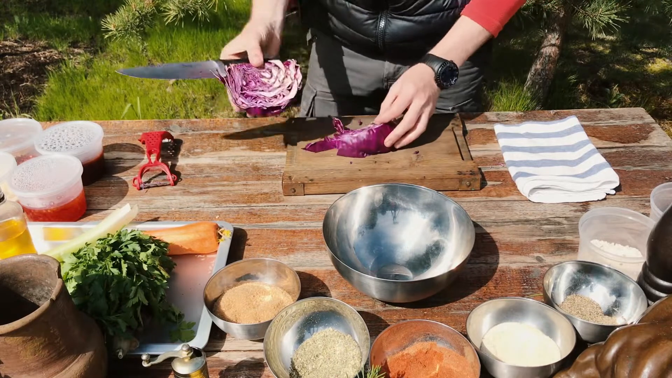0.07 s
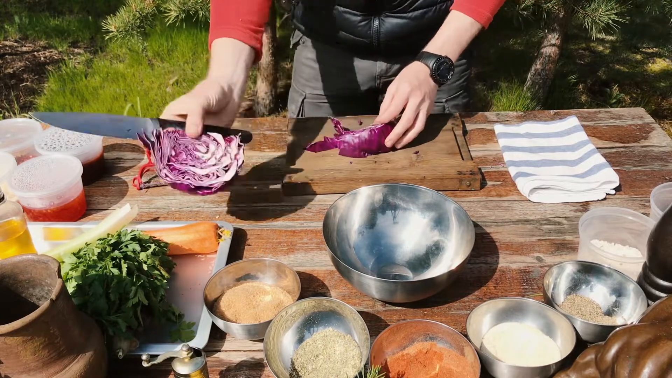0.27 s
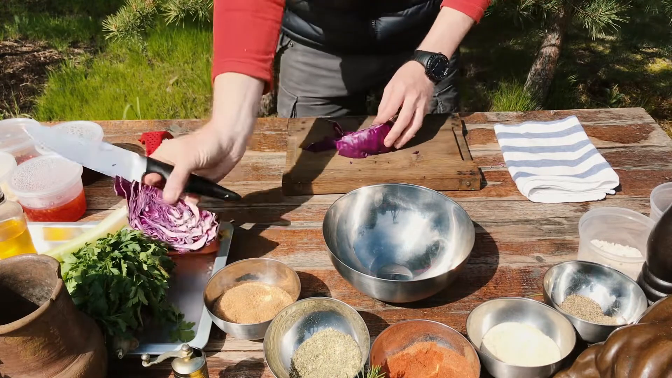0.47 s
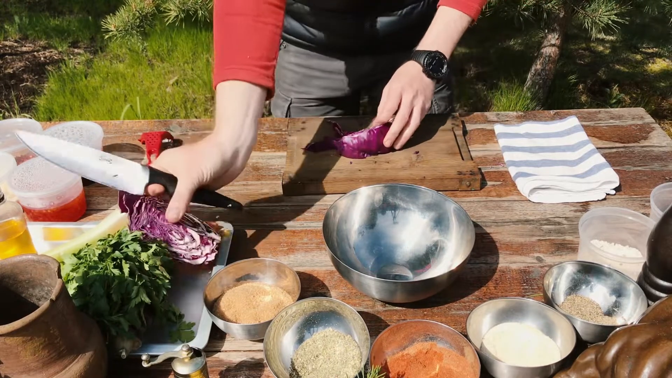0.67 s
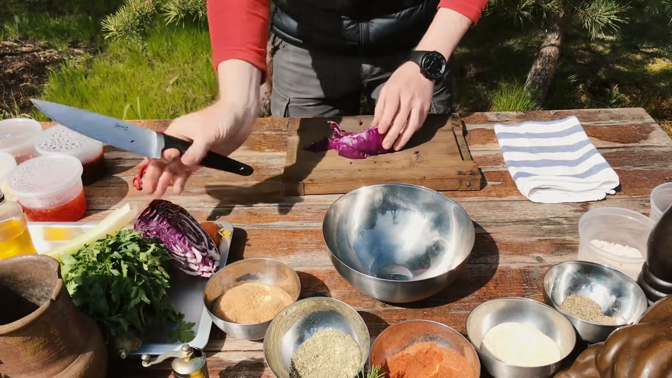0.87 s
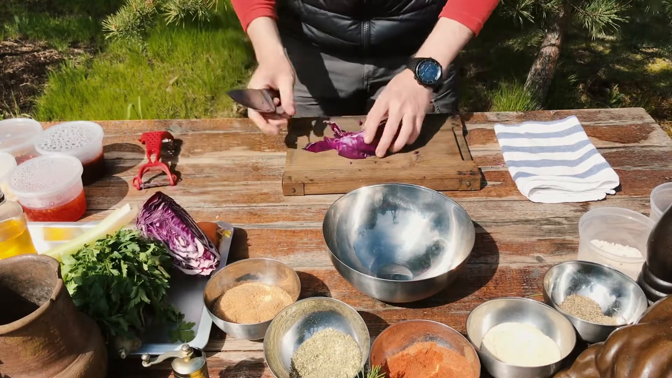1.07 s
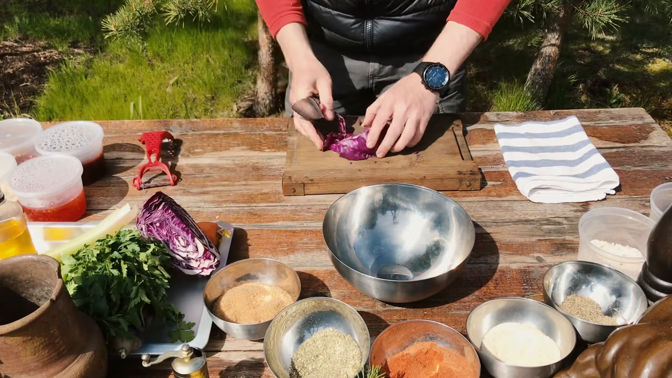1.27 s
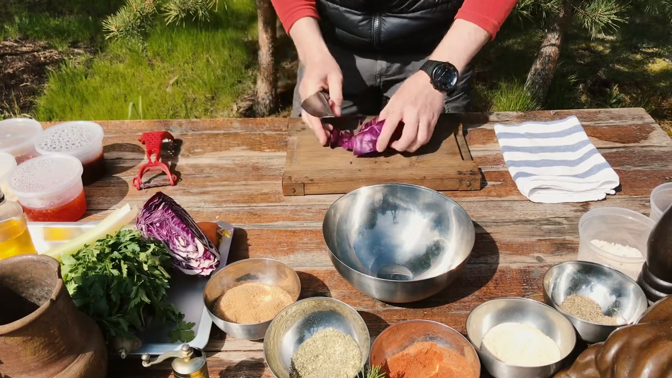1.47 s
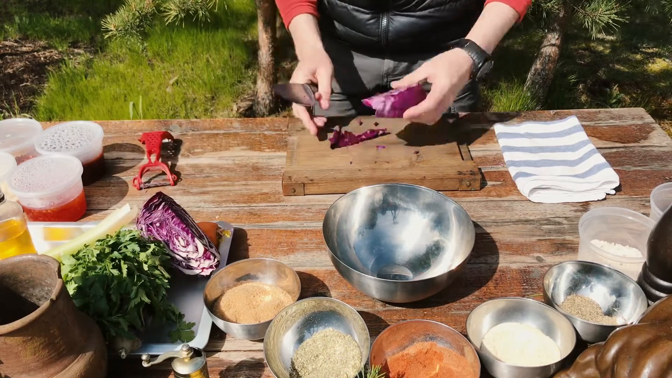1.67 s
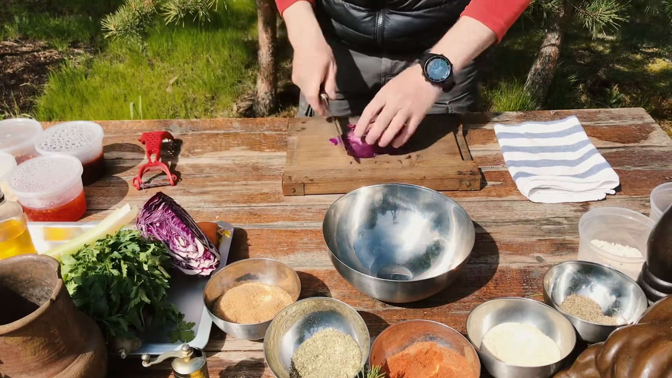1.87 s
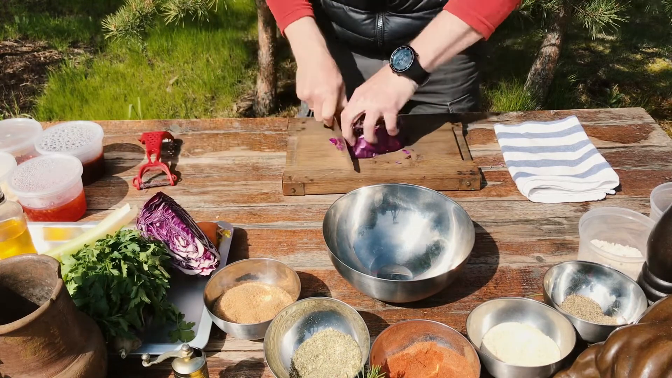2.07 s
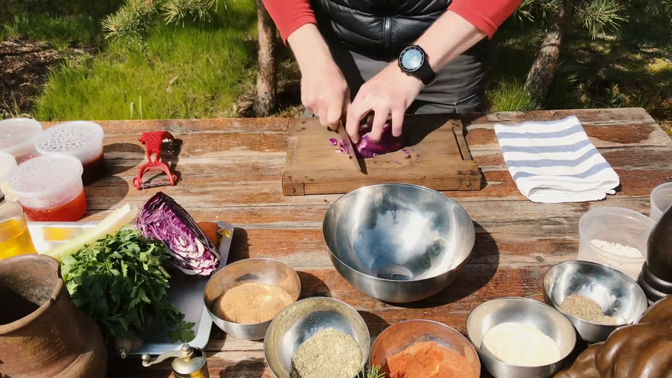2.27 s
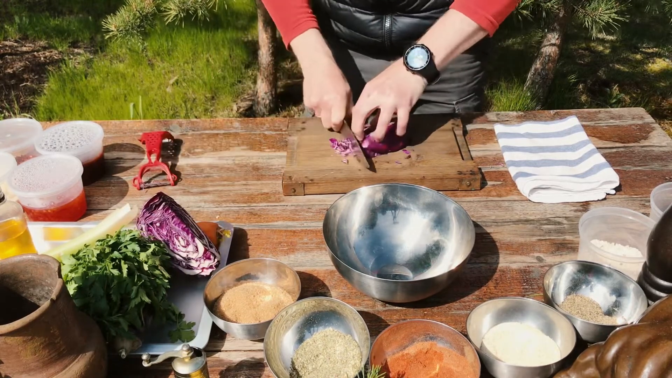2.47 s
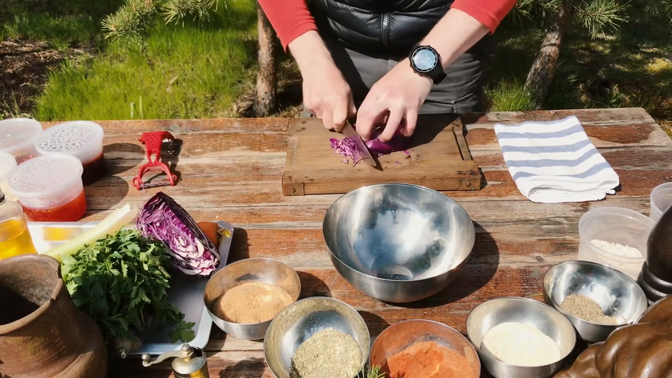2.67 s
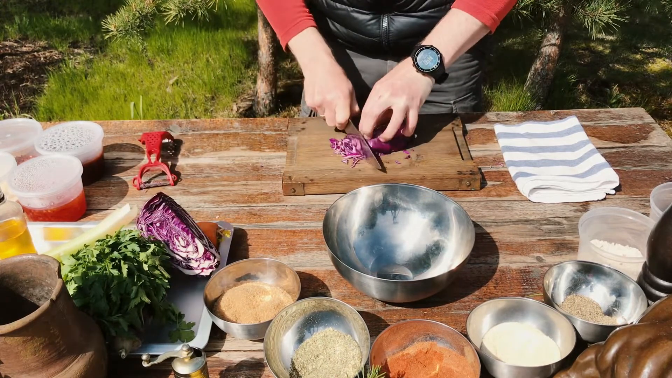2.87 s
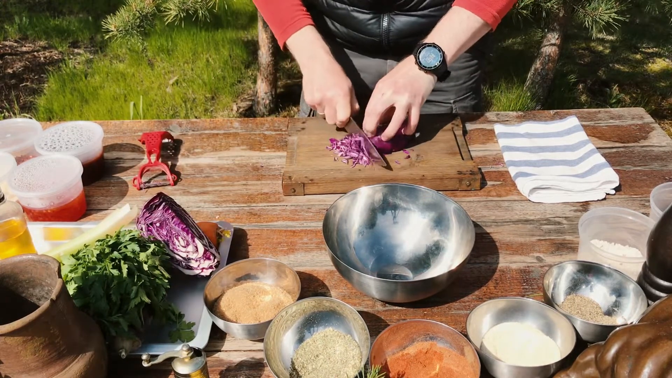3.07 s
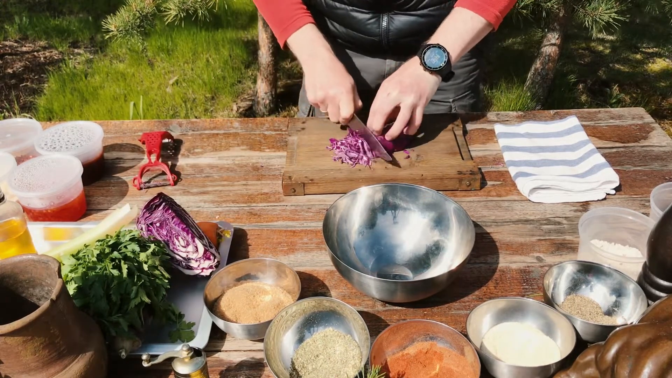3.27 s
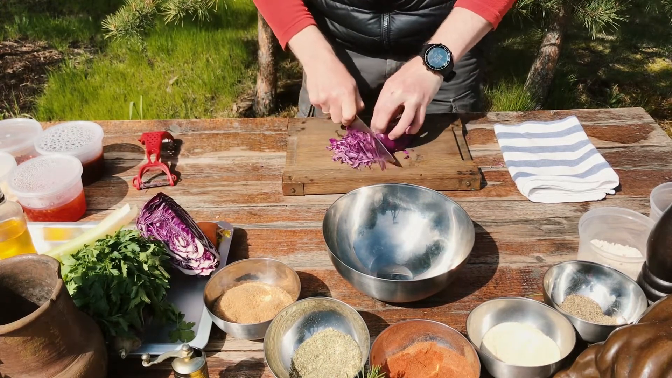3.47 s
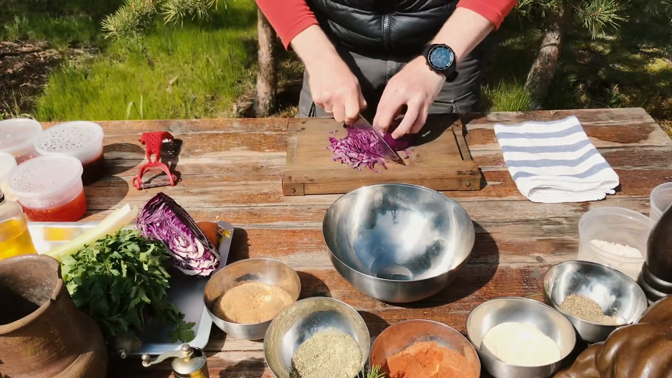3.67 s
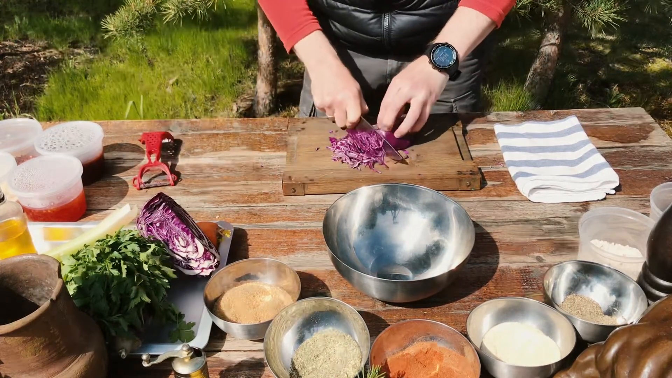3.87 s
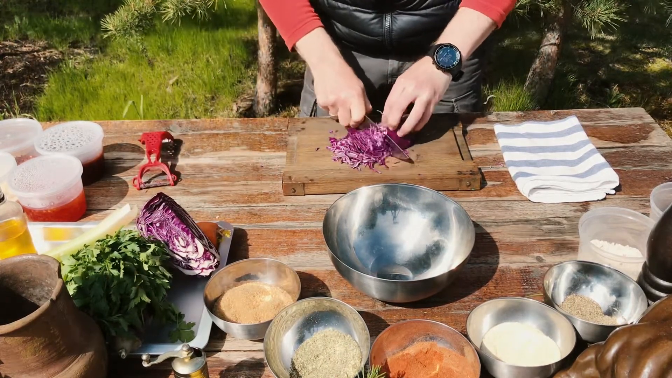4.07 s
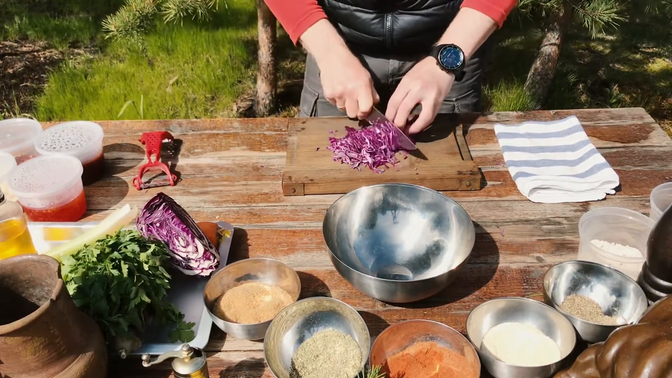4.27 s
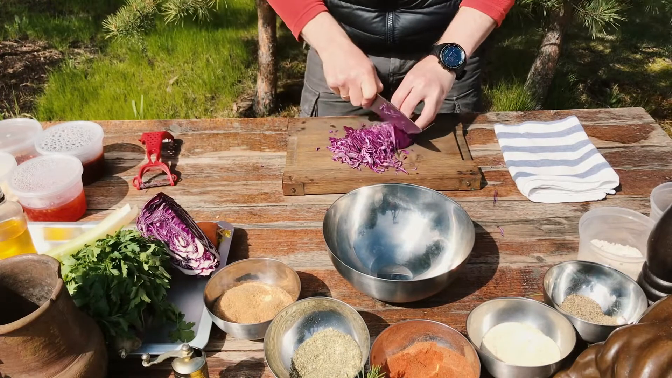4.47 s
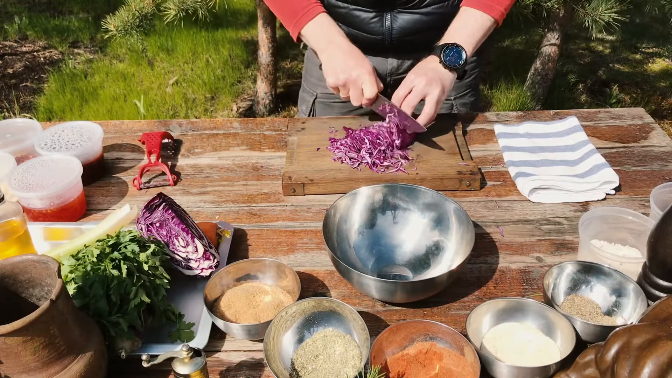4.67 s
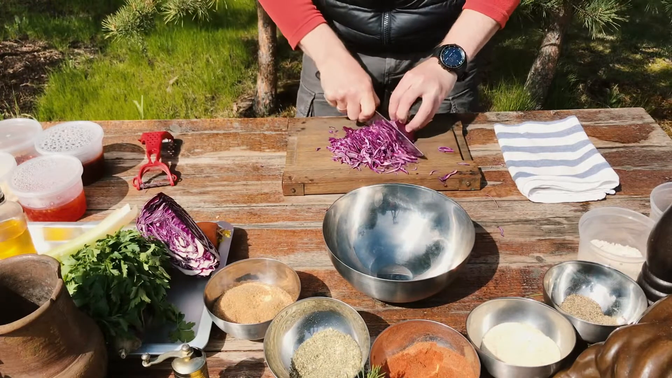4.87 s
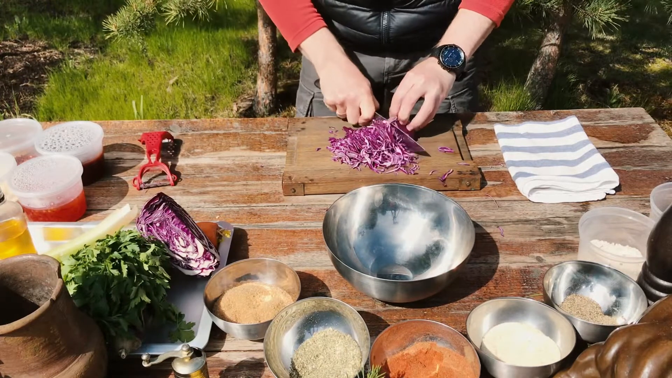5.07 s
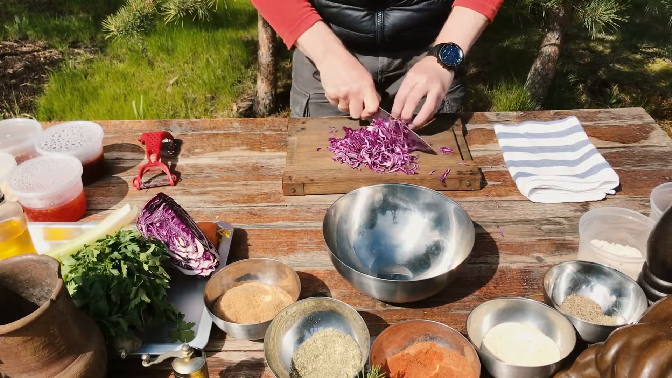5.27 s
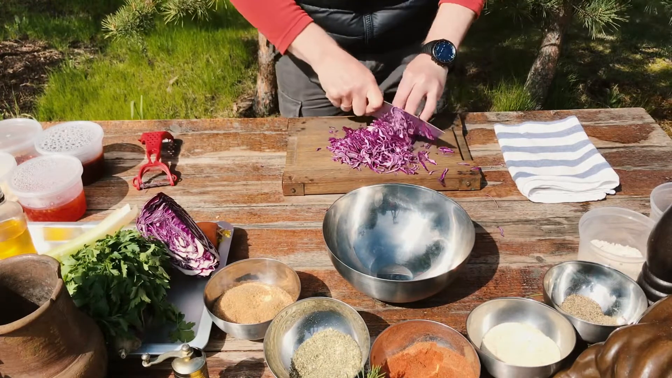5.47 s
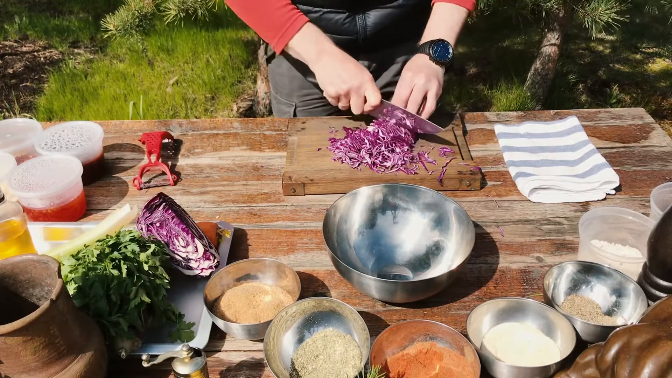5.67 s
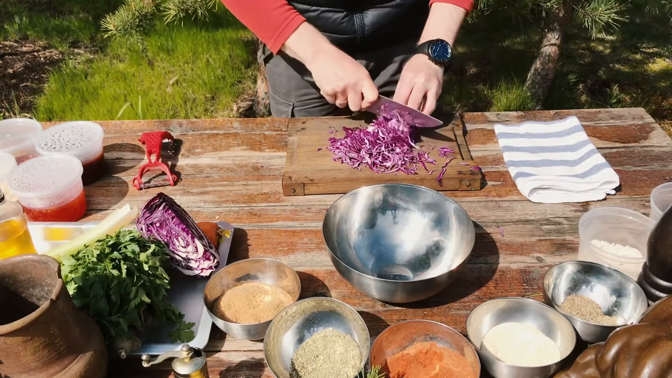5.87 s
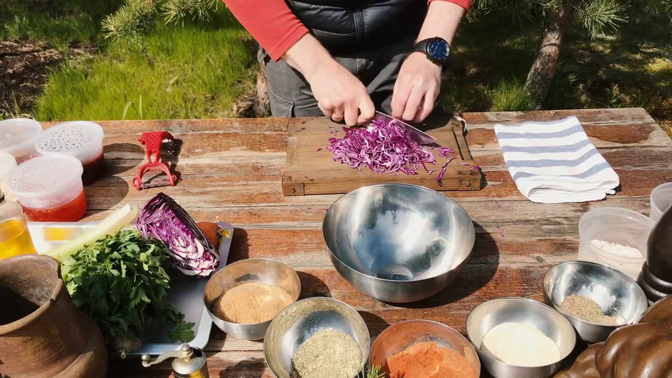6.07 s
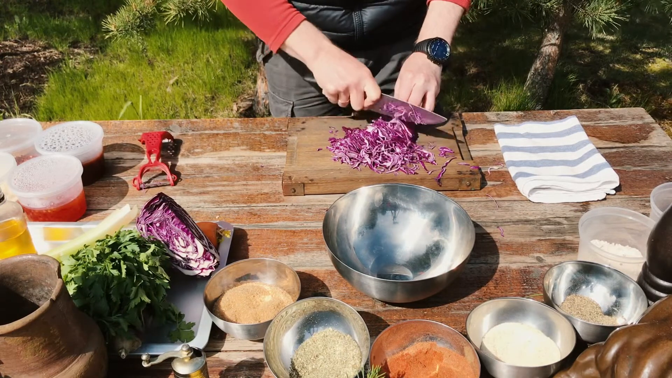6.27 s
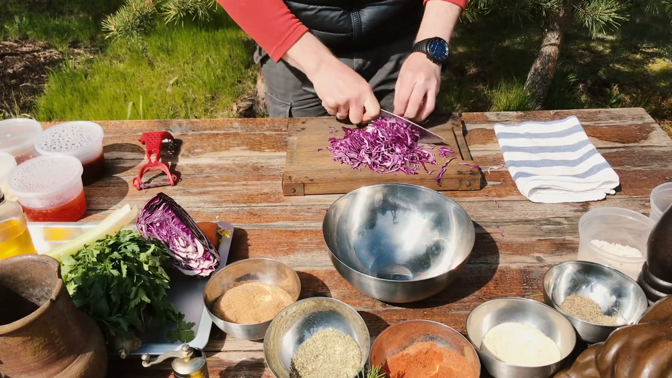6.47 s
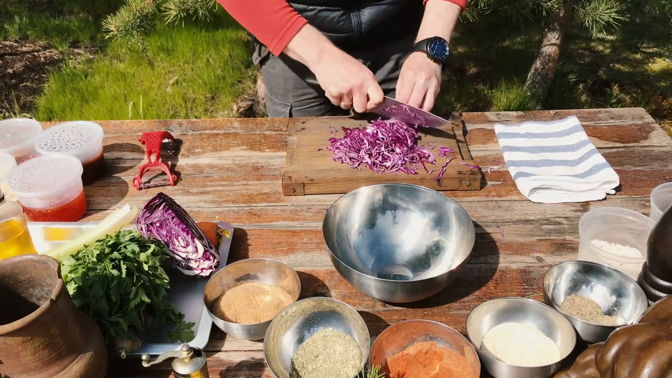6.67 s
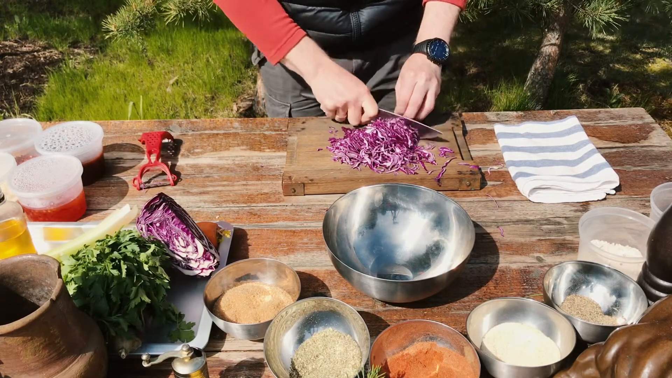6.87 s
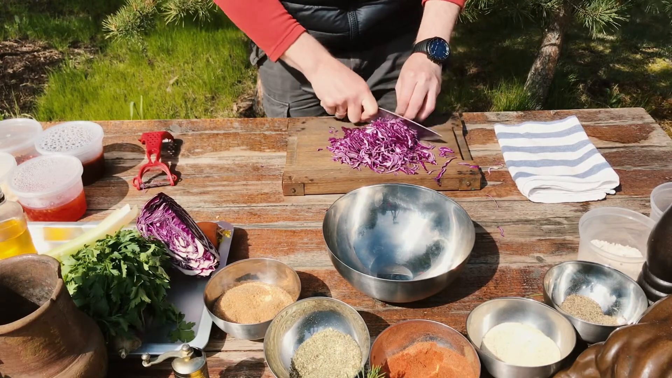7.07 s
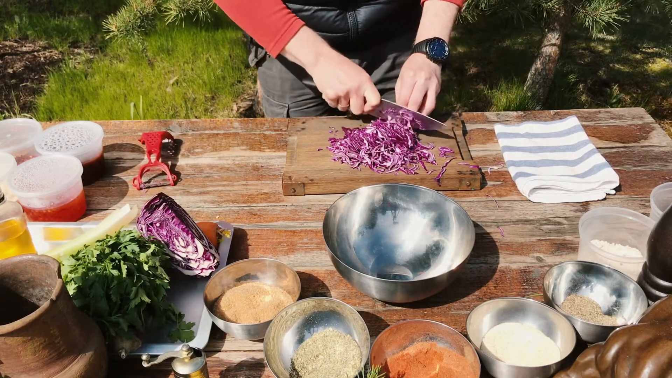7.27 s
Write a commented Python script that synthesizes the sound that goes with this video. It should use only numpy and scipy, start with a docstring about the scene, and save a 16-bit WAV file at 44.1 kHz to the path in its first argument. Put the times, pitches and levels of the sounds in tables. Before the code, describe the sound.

Outdoors in a quiet garden, a knife shreds crisp cabbage on a wooden board in quick runs of woody knocks and crunchy slices.

```python
"""Out of doors, on a plank table in a quiet garden, a chef's knife shreds red cabbage on a wooden board.
Strokes hiss as coloured, grainy noise; the edge then knocks in quick runs, each blow ringing damped modes.
Before the cutting, leaves rustle as sparse ticks and cabbage is set aside with soft bumps of fading noise.
A breeze rumbles over the hush as wandering noise, a thin wavering tone whistles far off,
and the table, the dishes and the trees answer with tails of fading noise."""
import sys
import numpy as np
from scipy import signal
from scipy.fft import rfft, irfft, next_fast_len
from scipy.io import wavfile
from scipy.ndimage import uniform_filter1d

SR = 44100
rng = np.random.default_rng(int(sys.argv[2]) if len(sys.argv) > 2 else 0)


def dump_mix(stems):
    """Bounce the given channels to the path in sys.argv[1] as a 16-bit WAV at rate SR."""
    frames = np.atleast_2d(stems).T  # one column per channel
    limited = np.clip(frames, -1, 1)  # hard clip at full scale
    pcm = np.round(limited * 32767).astype(np.int16)
    wavfile.write(sys.argv[1], SR, pcm)


N = 322128
TIME = np.arange(N) / SR  # s
SIZE = 4096  # samples in one blow
TOP_HZ = 15900

# Breeze on the microphone. Each row: time in seconds, relative rumble level in dB.
BREEZE = [(0.0, -64), (.3, -60), (.9, -72), (1.25, -64), (2.0, -67.5), (2.6, -75), (3.2, -69), (3.58, -71),
          (3.72, -48.5), (4.6, -55), (4.9, -65), (5.7, -56.5), (6.5, -59.5), (7.3, -57)]
# Hush of the garden. Each row: time in seconds, relative level in dB.
HUSH = [(0.0, -61), (.75, -61.5), (1.54, -66), (4.0, -65), (6.0, -61), (6.7, -63.5), (7.3, -62.5)]
# Spectra of the breeze and the garden. Each row: frequency in Hz, gain in dB.
RUMBLE_COLOUR = [(18, -18), (32, -13), (55, 5.5), (100, 2.5), (170, -9), (300, -22), (700, -45),
                 (2000, -79)]
GARDEN_COLOUR = [(15, -33.5), (25, -9), (58, -2.5), (102, -7), (145, -3.5), (229, -12), (270, -11.5),
                 (373, -11.5), (405, -9), (451, -18.5), (863, -13), (1330, -22), (5280, -35),
                 (16000, -38.5)]
# A thin high whistle far off. Each row: start in seconds, end in seconds, pitch in Hz,
# relative level in dB, depth of the waver in Hz.
WHISTLES = [(0.51, 1.07, 4050, -71, 110), (1.905, 2.113, 4160, -71, 380)]

# Spectra of the answers from table, dishes and trees. Each row: frequency in Hz, gain in dB.
TABLE_COLOUR = [(25, -21), (80, 3.0), (160, -2.5), (400, -7.5), (900, -16.5), (3000, -63)]
DISHES_COLOUR = [(300, 0.29), (3000, 0.32), (7000, 2.4)]
TREES_COLOUR = [(100, 11), (600, -3.0), (970, -5), (1550, 4), (2100, -1), (2600, -2), (3700, -6.0), (8000, 0.5)]

# Cabbage and hands meeting the table. Each row: time in seconds, relative peak level in dB,
# relative share of the mids in dB.
BUMPS = [(0.505, -46.5, -6.5), (0.582, -47, -8), (0.743, -34.5, -8), (1.087, -47.5, -35),
         (1.197, -35.5, -14), (1.789, -45.5, -16), (1.821, -39, -4)]
# Spectra of the bumps and of their low part. Each row: frequency in Hz, gain in dB.
BUMP_COLOUR = [(30, -37), (70, 9), (130, 2), (330, -1.5), (650, -16.5), (1400, -11), (2600, -27.5),
               (5000, -44), (16000, -53)]
BUMP_LOWS = [(350, 1.5), (900, -15.0)]

# Leaves rustling in the hands. Each row: start in seconds, end in seconds, level in dB.
RUSTLES = [(0.065, 0.087, -63), (0.45, 0.664, -63.5), (0.692, 0.798, -63.5), (0.743, 0.763, -52.5),
           (0.878, 0.97, -70), (1.32, 1.45, -66), (1.496, 1.528, -68.5), (1.931, 1.966, -61.5)]
# Spectrum of the rustling. Each row: frequency in Hz, gain in dB.
RUSTLE_COLOUR = [(300, -12), (1500, -4), (3200, 9), (6000, 5), (10000, -1), (14000, 2.5)]

# Strokes of the blade through the leaves. Each row: start in seconds, end in seconds, relative level in dB.
CUTS = [(2.229, 2.245, -53), (2.407, 2.48, -51.5), (2.639, 2.656, -58.5), (2.678, 2.71, -54),
        (2.893, 3.011, -51), (3.172, 3.297, -52.5), (3.45, 3.547, -49.5), (3.59, 3.624, -57),
        (3.798, 3.836, -47.5), (3.853, 3.923, -48), (4.093, 4.14, -55.5), (4.152, 4.192, -49.5),
        (4.264, 4.309, -49.5), (4.477, 4.512, -51), (4.53, 4.58, -49.5), (4.642, 4.696, -51.5),
        (4.798, 4.81, -62), (4.916, 5.078, -47), (5.243, 5.254, -62), (5.388, 5.49, -49),
        (5.602, 5.611, -49), (5.772, 5.863, -51), (6.062, 6.088, -52.5), (6.202, 6.245, -48),
        (6.268, 6.326, -52.5), (6.343, 6.45, -51), (6.496, 6.536, -57), (6.613, 6.64, -54.5),
        (6.675, 6.718, -58.5), (6.77, 6.798, -51.5), (7.057, 7.108, -57), (7.15, 7.198, -52.5),
        (7.263, 7.307, -55.5)]
# Spectra of the cut leaves and of the quiet share of their crackle. Each row: frequency in Hz, gain in dB.
LEAF_COLOUR = [(200, -58), (900, -9.5), (2000, -1.5), (4200, 0), (5200, -0.5), (7000, -1.5), (10500, -3),
               (13500, 2.5), (16000, 2)]
PART_COLOUR = [(5000, -16.0), (10000, -13)]

# Edge meets board. Each row: time in seconds, relative force in dB, hardness in dB, tick of the edge in dB.
KNOCKS = [(2.1409, 5.5, 0, 1), (2.1931, 5.5, 4, 1.5), (2.2341, 1.1, 3.5, -7.5), (2.42, -0.5, -12.5, 4),
          (2.46, -3, 6.5, -14), (2.4974, -7, -5, 4), (2.6901, 3, 2, -1.5), (2.723, 4, 4, -0.5),
          (2.7589, -5.5, -3.5, 7), (2.9157, -3.5, -4.5, 0), (2.947, 5.5, -4, 11.5), (2.9965, 2.5, -3.5, -5),
          (3.0401, -5, -5, 1.5), (3.193, 1, 0.5, 0.5), (3.2289, 6, -1, 1), (3.2734, 4.5, -2, 5),
          (3.3187, -6, 0, 2), (3.4799, -3, 1.5, -4), (3.5177, 5, -3.5, 5.5), (3.5567, 6, -.5, 4),
          (3.6129, -3.5, -1.5, 0), (3.763, -6, 5.5, 1.5), (3.8317, -2, -3.5, -3), (3.8762, 4.5, 1.5, 7.5),
          (3.9123, 2, 2, 2), (3.9719, -8.5, 3.5, -1), (4.188, 2, 2.5, 4.5), (4.235, 2, 9, -2.5),
          (4.344, -3.5, 4, 0), (4.5688, -0.2, 12.5, -5), (4.6137, 2, 13.5, -11), (4.6795, 2, 10.5, -5.5),
          (4.7279, -2, 4.5, .5), (4.8155, -16, 6, -19), (4.954, -0.3, 12, -11), (5.018, -.7, 3, 1),
          (5.0686, 3.5, 11, -5.5), (5.1132, -1.5, 7.5, 7), (5.1729, -7.5, 5.5, 0), (5.3303, 0.5, 0, 10.5),
          (5.3709, 2, 3.5, 6), (5.4346, 1.5, 1, 6), (5.6725, 0.7, 13, 3), (5.7313, 1.5, 7.5, 11.5),
          (5.8164, .5, 5.5, 0.5), (5.8626, 0, -4, 5), (5.9132, -8.5, 9, -8), (6.0, -18.5, -10, 0),
          (6.159, 2, 7.5, -2), (6.2373, 2.5, 6, 2.5), (6.385, 3, 3, 4.5), (6.444, 3.5, -5.5, 10.5),
          (6.5273, 2, 3, .5), (6.6431, 2.5, 1.5, -2.5), (6.7106, 1, -2, 2), (6.7932, 0, 4, -17),
          (6.8621, -2.5, 0, 1), (6.964, -1.5, -1.5, 5.5), (7.1036, -1, -8.5, 7.5), (7.3012, 5, -12, 13.5)]
# Modes of board, table and blade. Each row: nominal frequency in Hz, least width in Hz,
# then the response in dB when struck at the left, in the middle and at the right.
BOARD_MODES = [(101.3, 74, 10.5, 13, 9.5), (163, 32, 3, 12, -3), (244, 64, -1, -11, 8),
               (342, 63.0, 5, -11, 13.5), (413, 49, 7.5, 7, 12), (444, 61, 8, 5, 5),
               (545, 61, -8, -21, -7.5), (668, 43, 9.5, 12, 8.5), (970.3, 92.0, 9, 22, 17),
               (1126, 82, 12.5, 14.5, 7.5), (1225, 76, 0.5, 2, 9), (1394, 177, 2.5, 13, 15),
               (1474, 82, 18.5, 3, 17), (1550, 107.0, 16.5, 1.5, -6), (1731, 147, 5, 16.5, 9),
               (1952, 157, 10, 8.5, -18), (2327, 146, -17, 2, 9.5), (2499, 207, 14, -5.5, 7.5),
               (2772, 167, 11, -4, -2.5), (2996, 230, 3.5, 8.5, 2), (3362, 190, 5, 1, -4.5),
               (3516, 430, -1, 1.5, -10), (4140, 620, -12, -11.5, -1.6), (4566, 320, -27, -7.5, -5),
               (5550, 1066.0, -15, -12.5, -18), (6500, 1430, -15.5, -21.5, -29),
               (8580, 2800, -27.5, -26.5, -27), (12740, 6800, -27, -30, -42)]
# The knife works its way across the board. Each row: time in seconds, spot (0 left, 1 middle, 2 right).
SPOT = [(2.1, 0.054), (3.5, 0.31), (4.2, 0.75), (4.6, 0.92), (5.7, 1.33), (6.4, 1.9)]
# How heavily the hand leans on the board. Each row: time in seconds, weight in dB.
LEAN = [(2.1, 1), (3.3, .5), (3.8, -3), (4.25, 2), (4.6, 2.5), (4.85, 1), (6.4, 2.5), (7.1, 0.5)]
# Bright crack of the edge. Each row: time in seconds, boost in dB at the centre of the crack's band.
CRACK = [(2.1, -0.5), (3.1, 0), (4.0, 1.5), (5.15, -5), (5.32, 6.5), (5.45, 9), (5.67, -3), (6.3, 3),
         (7.1, -1)]
# Spectrum of the board clattering on the planks. Each row: frequency in Hz, gain in dB.
PLANKS_COLOUR = [(25, -32), (60, -7.5), (115, 1.5), (260, -7.5), (450, -1.5), (680, -9.0), (820, -15.5),
                 (1050, -3.0), (1500, -6.5), (2000, -15.5), (4000, -29.5), (9000, -45.5)]

CRACK_HZ, CRACK_WIDTH_HZ = 4740, 750
# a blow after a pause this long opens a new run; the first blow of a run is short and lighter in the lows
PAUSE_S = 0.125
RING_S, FIRST_RING_S, FIRST_DB = 0.075, 0.022, -1.5
# the weight of the hand changes little with the force, so light blows sound heavier
WEIGHT_DB_PER_FORCE_DB = -0.38
# around each knock the blade crushes the shreds beneath it, then stalls for a moment
CRUSH_DB, CRUSH_LEAD_S, CRUSH_FADE_S = -58.5, 0.0066, 0.013
STALL_DB, STALL_AFTER_S, STALL_WIDTH_S = -9, 0.019, 0.011


def undb(db):
    """Decibels to gain."""
    return 10 ** (np.asarray(db) / 20)


def unit(x):
    """Scale to an rms of 1."""
    return x / np.sqrt(np.mean(x ** 2))


def add(out, start_s, x):
    """Mix x into out from start_s on."""
    i = int(np.clip(round(start_s * SR), 0, N))
    out[i:i + len(x)] += x[:N - i]


def curve(points, s):
    """Value of a table of (time, value) points at the times s."""
    return np.interp(s, *np.transpose(points))


def gains(points, hz):
    """Gain of a (Hz, dB) spectrum at the given frequencies."""
    f, db = np.transpose(points)
    return undb(np.interp(np.log(hz + 1), np.log(f), db))


def colour(x, points):
    """Filter x by a (Hz, dB) spectrum."""
    n = next_fast_len(len(x), True)
    return irfft(rfft(x, n) * gains(points, np.fft.rfftfreq(n, 1 / SR)), n)[:len(x)]


def ramp(hz, lo_hz, hi_hz):
    """0 below lo_hz, 1 above hi_hz, straight on a log axis in between."""
    return np.clip(np.log((hz + 1) / lo_hz) / np.log(hi_hz / lo_hz), 0, 1)


def causal(gain):
    """Spectrum of a struck body with these gains: all ringing follows the blow."""
    cepstrum = irfft(np.log(gain + 1e-5))
    cepstrum[1:SIZE // 2] *= 2
    cepstrum[SIZE // 2 + 1:] = 0
    return np.exp(rfft(cepstrum))


def walk(rate):
    """A random wander around zero that heads for a new value rate times a second."""
    knots = np.arange(0, N / SR + 1, 1 / rate)
    return np.interp(TIME, knots, rng.standard_normal(len(knots)))


def grains(grain_db, limit, share):
    """Noise that sounds only in a random share of the samples, with a few loud ones among them."""
    noise = rng.standard_normal(N)
    strength = rng.exponential(size=N).clip(0, limit)
    return noise * undb(grain_db * strength) * (rng.random(N) < share)


def air(garden_db=2, gust_db=3, flicker_db=1):
    """A breeze buffets the microphone over the hush of the garden."""
    rumble = unit(colour(rng.standard_normal(N), RUMBLE_COLOUR))
    rumble *= undb(curve(BREEZE, TIME) + gust_db * walk(16))
    hush = unit(colour(rng.standard_normal(N), GARDEN_COLOUR))
    hush *= undb(curve(HUSH, TIME) + garden_db + flicker_db * walk(7.8))
    return rumble + hush


def whistles(flutter_db=3):
    """A faint, thin note that swells and fades; the more it wavers, the airier it sounds."""
    out, waver = np.zeros(N), walk(700)
    for start, end, hz, db, waver_hz in WHISTLES:
        swell = np.sin(np.pi * np.clip((TIME - start) / (end - start), 0, 1))
        phase = 2 * np.pi * np.cumsum(hz + waver_hz * waver) / SR
        out += undb(db) * swell * np.sin(phase)
    return out * undb(flutter_db * walk(37.5))


def tail(noise, start_s, t60):
    """Noise of unit energy from start_s on, fading by 60 dB in t60 seconds."""
    t = np.arange(len(noise)) / SR
    y = noise * (t > start_s) * undb(-60 * t / t60)
    return y / np.sqrt(np.sum(y ** 2))


def surroundings(x, table_db=-3, dishes_db=-21, trees_db=-26):
    """The table booms on, the dishes scatter the sound, and the trees send back a faint late echo."""
    noise = rng.standard_normal((3, SR * 3 // 4))
    table = colour(tail(noise[0], 0.0098, 0.15), TABLE_COLOUR)
    dishes = colour(tail(noise[1], 0.0038, 0.061), DISHES_COLOUR)
    trees = colour(tail(noise[2], 0.03, 0.63), TREES_COLOUR)
    # a fast random flutter blurs the notes of the late echo into a wash
    blurred = x * 1.2 * walk(420)
    close = signal.fftconvolve(x, undb(table_db) * table + undb(dishes_db) * dishes)
    return (close + signal.fftconvolve(blurred, undb(trees_db) * trees))[:N]


def bumps(level_db=2, mids_offset_db=11.5, rise_s=0.0025, fade_s=0.016, crush_s=0.015):
    """Soft, leafy things land on the planks: a brief crush together with a dull thud."""
    out, t = np.zeros(N), np.arange(2 * SIZE) / SR
    for (s, db, mids_db), noise in zip(BUMPS, rng.standard_normal((len(BUMPS), len(t)))):
        body = unit(colour(noise, BUMP_COLOUR))
        low = colour(body, BUMP_LOWS)
        crush = (body - low) * undb(mids_db + mids_offset_db) * np.exp(-t / crush_s)
        bump = (low * np.exp(-t / fade_s) + crush) * (1 - np.exp(-t / rise_s))
        add(out, s, bump / abs(bump).max() * undb(db + level_db))
    return out


def rustles(grain_db=9.5):
    """Fingers and leaves rub past each other in sparse little ticks."""
    grip = np.zeros(N)
    for start, end, db in RUSTLES:
        grip += undb(db) * np.sin(np.pi * np.clip((TIME - start) / (end - start), 0, 1))
    ticks = grains(grain_db, 4, 0.4)
    return unit(colour(ticks, RUSTLE_COLOUR)) * grip


def blade_pressure():
    """Steady through each stroke, checked just after each knock, with a crush of shreds around the knock."""
    pressure, crush = np.zeros(N), np.zeros(N)
    for start, end, db in CUTS:
        pressure[int(start * SR):int(end * SR)] = undb(db)
    for s, *_ in KNOCKS:
        near = slice(int(s * SR) - SIZE, int(s * SR) + SIZE)
        t = TIME[near] - s
        pressure[near] *= undb(STALL_DB * np.exp(-((t - STALL_AFTER_S) / STALL_WIDTH_S) ** 2))
        crush[near] += np.exp(np.minimum(t / CRUSH_LEAD_S, -t / CRUSH_FADE_S))
    return np.hypot(pressure, undb(CRUSH_DB) * crush)


def leaves(level_db=0.5, grain_db=2.5, flutter_db=6.0, shift_db=2, edge_s=0.0075):
    """Countless cells burst under the edge: a dense, bright crackle that follows the blade's pressure."""
    pressure = uniform_filter1d(blade_pressure(), max(2, int(edge_s * SR)))
    crackle = unit(colour(grains(grain_db, 6, 0.5), LEAF_COLOUR))
    # two shares of the crackle, a quiet one and the rest, wander in level independently
    part = colour(crackle, PART_COLOUR)
    rest = crackle - part
    mixed = part * undb(shift_db * np.tanh(walk(76))) + rest * undb(shift_db * walk(64))
    return mixed * pressure * undb(level_db + flutter_db * np.tanh(walk(170)))


def blows():
    """Each knock with the spot it lands on, the weight behind it and how long each blow rings."""
    s, db, hard_db, tick_db = np.transpose(KNOCKS)
    opens_run = np.diff(s, prepend=0) > PAUSE_S
    weight_db = WEIGHT_DB_PER_FORCE_DB * db + curve(LEAN, s) + FIRST_DB * opens_run
    ring_s = np.where(opens_run, FIRST_RING_S, RING_S)
    return zip(s, db, curve(SPOT, s), weight_db, hard_db, tick_db, ring_s)


def knocks(bass_db=-4.0, scatter_db=1.47, rough=0.65, burst_s=0.0024, clatter_db=5.0, clatter_s=0.0069):
    """The edge strikes the board; the spot decides how strongly each mode answers."""
    hz, t = np.fft.rfftfreq(SIZE, 1 / SR), np.arange(SIZE) / SR
    modes = np.array(BOARD_MODES)
    mode_hz = modes[:, :1]
    # wet wood damps every mode quickly
    width = np.maximum(modes[:, 1:2], 60 + 0.04 * mode_hz)
    # bending waves: the low notes travel slowly through the wood and come late (delay in s)
    delay = 0.0038 / (1 + (hz / 1100) ** 4) + 0.005 / (1 + (hz / 200) ** 2)
    spread = np.exp(-2j * np.pi * np.cumsum(delay) * SR / SIZE)
    # the blade chatters: part of the blow lands again a moment later
    again = 0.42 * np.exp(-2j * np.pi * hz * 0.00235) * (1 - 0.8 * ramp(hz, 3500, 7000))
    # a short noise burst roughens each blow, most of all in the treble
    roughness = rough * (0.96 + 1.9 * ramp(hz, 2000, 4900))
    planks = gains(PLANKS_COLOUR, hz)
    out = np.zeros(N)
    chance = rng.standard_normal((len(KNOCKS), 2, len(modes)))
    grain = rng.standard_normal((len(KNOCKS), 2, SIZE))
    for knock, (size, detune), (noise, shudder) in zip(blows(), chance, grain):
        s, db, spot, weight_db, hard_db, tick_db, ring_s = knock
        # blend the responses of the two nearest spots
        share = np.maximum(0, 1 - abs(np.clip(spot, 0, 2) - np.arange(3)))
        drive = undb(modes[:, 2:]) ** 2 @ share * undb(scatter_db * size) ** 2
        # each mode's pitch varies a little at random from blow to blow
        centre = mode_hz + 12 * detune[:, None]
        # steep resonances swell for a few cycles before they fade
        power = 1 / (1 + ((hz ** 2 - centre ** 2) / ((hz + 1) * width)) ** 2) ** 2

        touch_db = (weight_db + bass_db) * (1 - ramp(hz, 430, 1010))
        touch_db += hard_db * ramp(hz, 1860, 3350)
        touch_db += tick_db * ramp(hz, 2780, 6200)
        touch_db += curve(CRACK, s) * np.exp(-((hz - CRACK_HZ) / CRACK_WIDTH_HZ) ** 2)
        body = causal(np.sqrt(drive @ power) * undb(touch_db))

        burst = noise * np.exp(-t / burst_s)
        contact = 1 + again + roughness * rfft(burst) / np.linalg.norm(burst)
        contact /= np.sqrt(1 + abs(again) ** 2 + roughness ** 2)
        # the chatter and the burst leave the energy of the struck body as it was
        contact *= np.linalg.norm(body) / np.linalg.norm(body * contact)
        blow = irfft(body * spread * contact)

        # the loose, jolted board clatters on the planks: a dense, woody thud that swells late
        jolt = shudder * t * np.exp(-t / clatter_s)
        clatter = irfft(rfft(jolt) / np.linalg.norm(jolt) * planks)
        blow += clatter * undb(clatter_db + weight_db)
        add(out, s, undb(db) * blow * np.exp(-(t / ring_s) ** 4))
    return out


def scene():
    """Knife, leaves and bumps on the table, in the open air."""
    work = knocks() + leaves() + rustles() + bumps()
    return (work + surroundings(work) + air() + whistles())[None]


def record(dry):
    """The microphone thins the deepest rumble, rounds the hardest peaks and cuts the very top."""
    low_cut = signal.butter(2, 32, "highpass", fs=SR, output="sos")
    top_cut = signal.ellip(10, 0.2, 70, TOP_HZ, fs=SR, output="sos")
    thinned = signal.sosfilt(low_cut, dry)
    rounded = 0.5 * np.tanh(2 * thinned)
    return signal.sosfilt(top_cut, rounded)


dry = scene()
out = record(dry)
dump_mix(out)
```